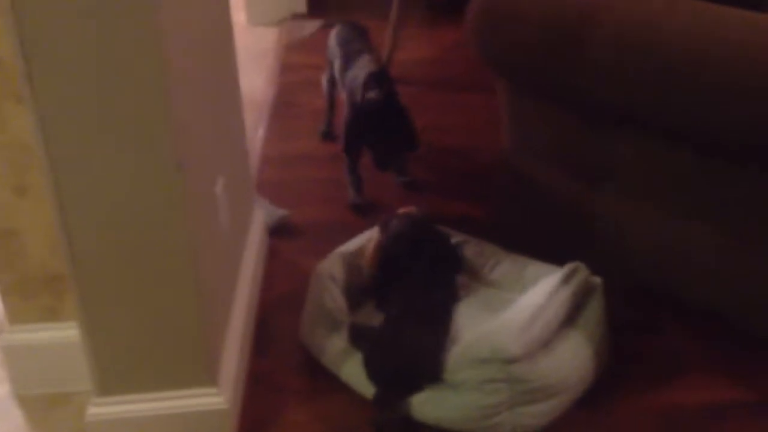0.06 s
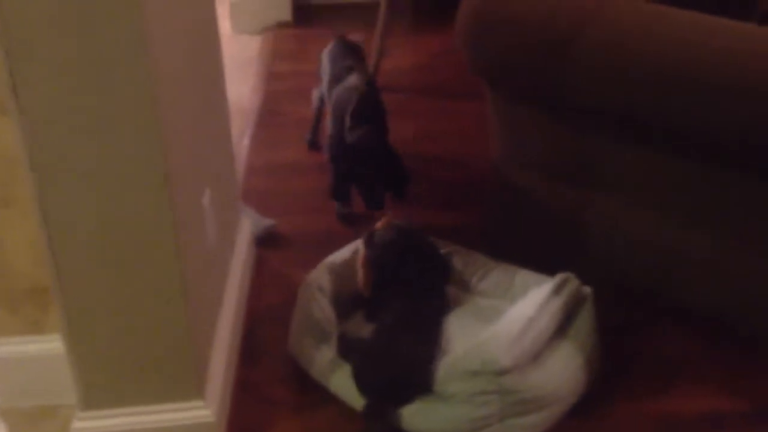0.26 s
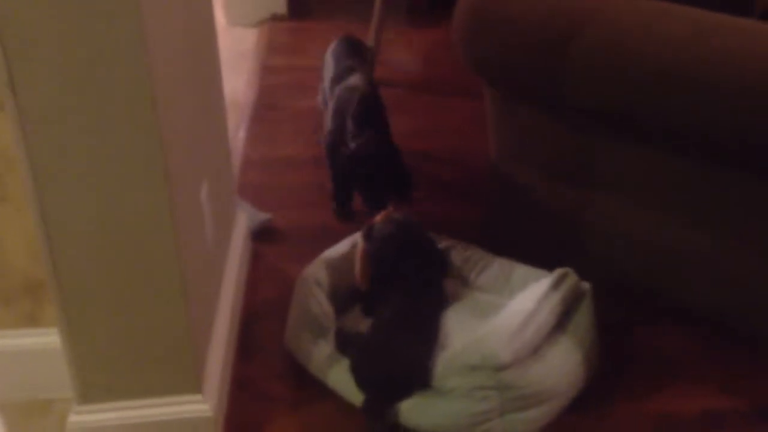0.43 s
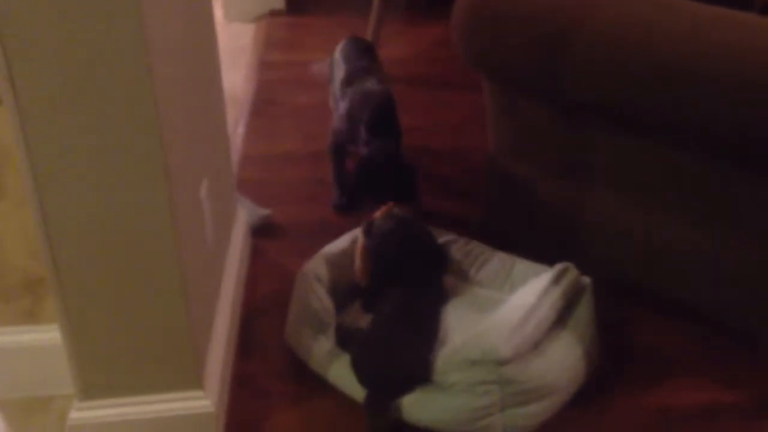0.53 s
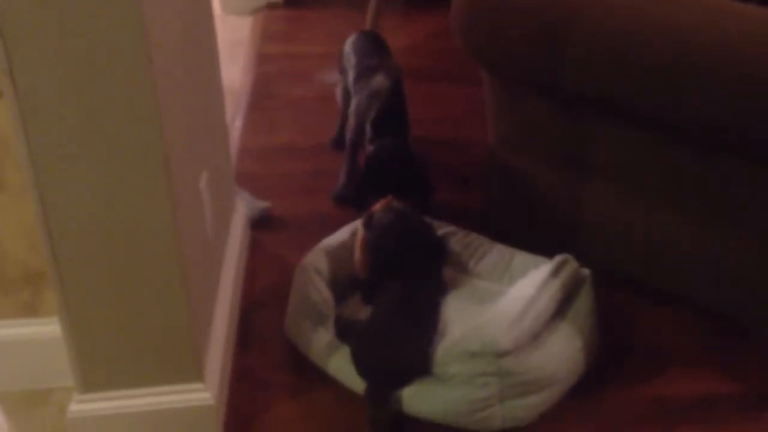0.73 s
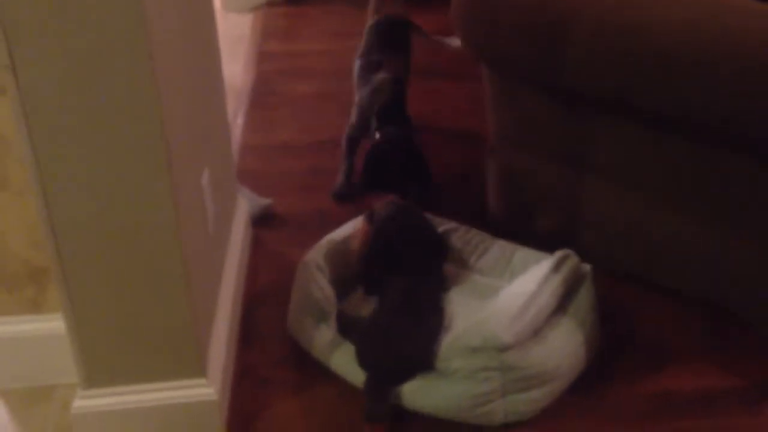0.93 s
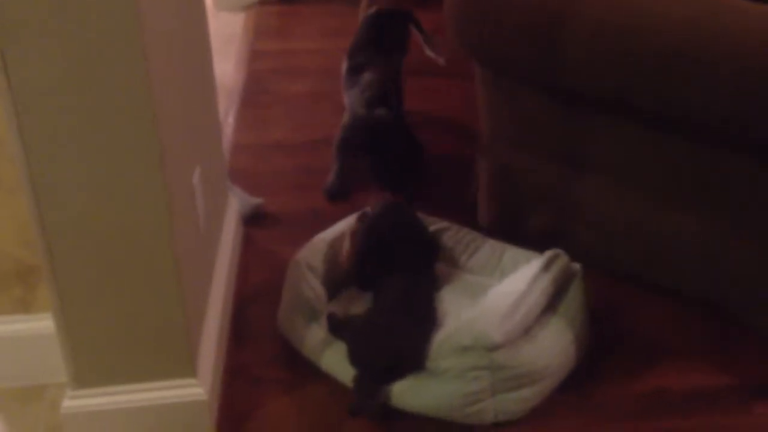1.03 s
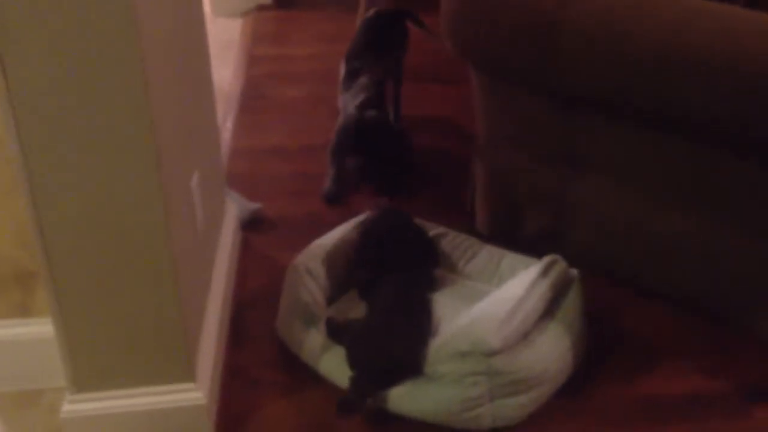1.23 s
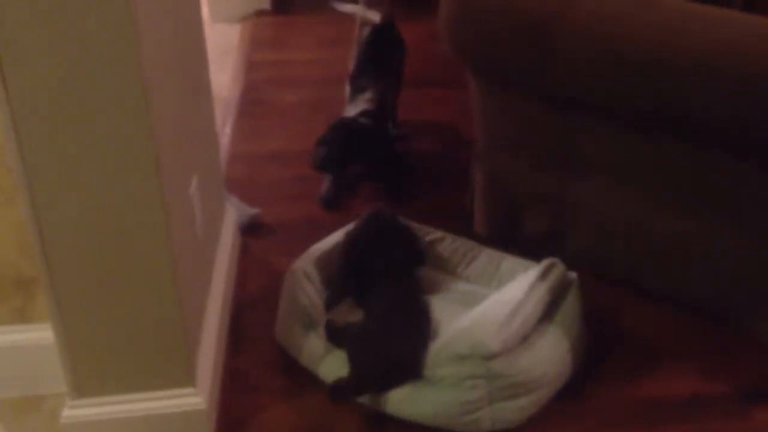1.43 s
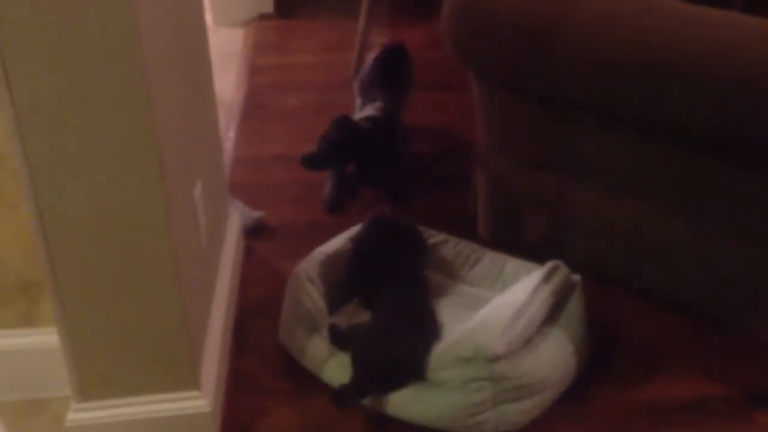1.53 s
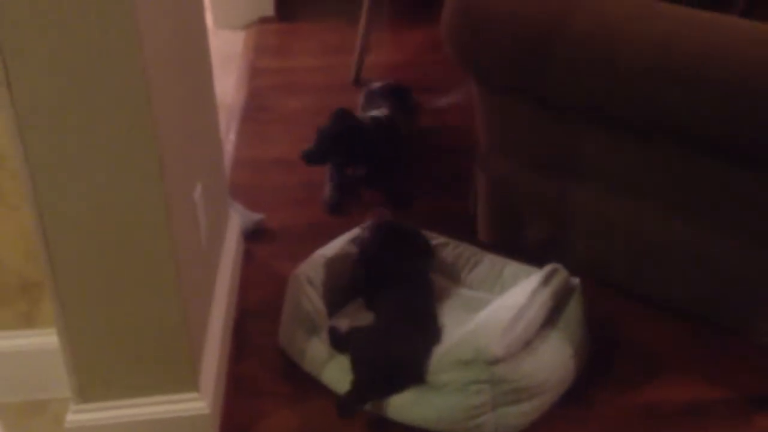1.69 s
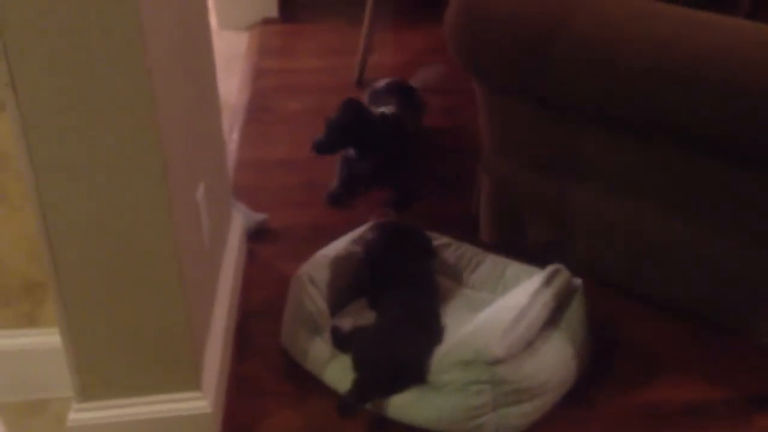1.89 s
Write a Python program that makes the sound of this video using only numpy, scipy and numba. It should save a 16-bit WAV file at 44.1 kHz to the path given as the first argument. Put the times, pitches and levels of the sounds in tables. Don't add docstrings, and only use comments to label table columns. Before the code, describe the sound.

A puppy gives a long, low, uneven growl in a wooden-floored hallway, collar tags tinkling

```python
import sys
import numpy as np
from scipy import signal
from scipy.io import wavfile
from scipy.ndimage import uniform_filter1d
from numba import njit

SR = 44100
rng = np.random.default_rng(int(sys.argv[2]) if len(sys.argv) > 2 else 0)


def nominal_scale(level):
    x = np.asarray(level, float) / 20
    return 10 ** x


def to_wav(s):
    ch = np.atleast_2d(s).T
    pcm = np.round(np.clip(ch, -1, 1) * 32767)
    wavfile.write(sys.argv[1], SR, pcm.astype(np.int16))


N = 85995

# (t/s, level/dB peak, bright edge level/dB, thud level/dB)
CLAW_TAPS = [(0.577, -55, -72, -80), (0.697, -49, -69, -85), (.7295, -79, -62, -85), (0.752, -80, -51, -73),
             (.7685, -75, -56, -85), (.857, -59, -57, -66), (1.2883, -62, -53, -84),
             (1.3214, -43, -65, -76), (1.3735, -64, -44, -61), (1.4536, -44.5, -75, -75),
             (1.5332, -60, -75, -85), (1.5517, -57, -64, -88), (1.557, -43, -64, -81),
             (1.566, -63, -56, -85), (1.579, -64, -66, -85), (1.6083, -39, -47.5, -68),
             (1.6168, -54, -66, -66), (1.624, -64, -61, -80), (1.6662, -51.5, -51, -85)]


@njit
def sweep(x, g, k):
    y, b, l = np.empty(len(x)), 0., 0.
    for i in range(len(x)):
        v = (b + g[i] * (x[i] - l)) / (1 + g[i] * (g[i] + k[i]))
        b, l, y[i] = 2 * v - b, l + 2 * g[i] * v, k[i] * v
    return y


def svf(x, hz, width):
    ones = np.ones(len(x))
    return sweep(x, np.tan(np.pi * hz / SR) * ones, width / hz * ones)


def unit(x):
    return x / np.sqrt(np.mean(x ** 2))


def walk(rate):
    hold = int(SR / rate)
    stairs = np.repeat(rng.standard_normal(N // hold + 1), hold)
    return unit(uniform_filter1d(uniform_filter1d(stairs, hold), hold)[:N])


def strike(times, gains, modes, cycles=0.42):
    t = np.arange(N) / SR
    luck = rng.standard_normal((len(times), 2 * len(modes)))
    out = np.zeros(N)
    for start, gain, r in zip(times, gains, luck):
        i = int(start * SR)
        u = t[i:i + SR // 4] - start
        for k, (hz, db, t60) in enumerate(modes):
            detuned_hz = hz * (1 + 0.0074 * r[2 * k + 1])
            ringing = np.sin(2 * np.pi * detuned_hz * u) * 1000. ** (-u / t60)
            contact = np.clip(u * hz / cycles, 0, 1)
            out[i:i + len(u)] += gain * nominal_scale(db + 1.9 * r[2 * k]) * ringing * contact
    return out


def house():
    # (f/Hz, level/dB per Hz)
    rumble_curve = [(65, -27), (110, -16.5), (284, 4.5), (650, -9.5), (832, -9), (923, -12.5), (1370, -13),
                    (1820, -19.5), (15300, -25)]
    # (f/Hz, level/dB)
    hum_lines = [(120, -99), (183, -75), (298, -85.5)]
    curve_hz, curve_db = np.array(rumble_curve).T
    rumble = 0
    for hz in 100 * 2 ** np.arange(0, 7.4, 1 / 3):
        band = svf(svf(rng.standard_normal(N), hz, hz / 3), hz, hz / 3)
        flicker_db = 0.5 * walk(8.1) * min(800 / hz, 1)
        rumble = rumble + band * nominal_scale(np.interp(np.log(hz), np.log(curve_hz), curve_db) + flicker_db)
    t = np.arange(N) / SR
    hum = sum(nominal_scale(db + 6.5 + 1.9 * walk(11)) * np.sin(2 * np.pi * hz * t) for hz, db in hum_lines)
    throb = unit(svf(rng.standard_normal(N), 95.0, 27.0))
    return nominal_scale(-62) * unit(rumble) + hum + nominal_scale(-64) * throb


def lens():
    # (t/s, level/dB peak)
    motor_ticks = [(.0402, -54), (.043, -52), (.0609, -56), (0.0644, -51), (0.1706, -50), (.1785, -52),
                   (.1802, -55), (.185, -54), (.1922, -57), (0.195, -50), (0.2026, -53), (0.2053, -52),
                   (.211, -54), (0.214, -53), (.219, -52), (0.2273, -51), (0.236, -53), (.2489, -56),
                   (.252, -51), (0.2595, -53)]
    # (f/Hz, level/dB, t60/s)
    housing = [(8880, 6, 0.0032), (10600, 7.5, 0.0015), (12800, 5, 0.0017)]
    times, db = np.array(motor_ticks).T
    return strike(times, nominal_scale(db - 7.0), housing)


def feet():
    # (t/s, level/dB peak)
    paw_knocks = [
        (0.206, -45.5),
        (0.214, -51),
        (1.899, -82),
        (1.91, -78),
    ]
    # (f/Hz, level/dB, t60/s)
    board_modes = [(291, -1, 0.19), (408, -6, 0.17), (767, -1, 0.021), (1020, -0.5, 0.015),
                   (1305, 17.5, 0.0046), (1700, 9, 0.0088), (2110, -6, 0.011)]
    claw_modes = [(2100, -6, .007), (3300, -2, .007), (4000, -2, .006), (4700, -3, .006)]
    edge_modes = [(7200, -3, .003), (8500, -4, .003), (11200, -4, .003), (12800, -5, .002),
                  (14300, -10, .002)]
    # (t/s, level/dB, length/s, centre f/Hz)
    scuffs = [
        (.29, -72.5, 0.084, 4200),
        (0.53, -69, 0.045, 2200),
        (1.31, -64.5, 0.046, 3960),
        (1.545, -59, 0.063, 4000),
        (2, -62, 0.023, 4300),
        (1, -62, 0.039, 12000),
        (.857, -70.5, 0.087, 10600),
        (1.165, -73, 0.035, 11000),
    ]
    t = np.arange(N) / SR
    times, db, edge_db = np.array(CLAW_TAPS).T[:3]
    out = strike(times, nominal_scale(db - 1.0), claw_modes, cycles=1.63)
    out = out + strike(times, nominal_scale(edge_db - 1.5), edge_modes)
    times, db = np.array(paw_knocks).T
    out = out + strike(times, -nominal_scale(db - 7.0), board_modes, cycles=0.66)
    for start, db, length, hz in scuffs:
        grit = rng.standard_normal(N) * nominal_scale(1.6 * walk(300))
        rise = np.clip((t - start) / 0.0078, 0, 1)
        fall = np.clip(1 - (t - start) / length, 0, 1) ** .5
        rub = svf(svf(grit, hz, .5 * hz), hz, .5 * hz) + 0.44 * svf(grit, 6700.0, 5500.0)
        out = out + nominal_scale(db) * rise * fall * unit(rub)
    return out


@njit
def fire(hz, stretch, size, weak):
    pulses, gate, p, k = np.zeros(len(hz) + 1), np.empty((2, len(hz))), 0., 0
    for i in range(len(hz)):
        step = hz[i] * stretch[k] / SR
        p += step
        if p >= 1:
            p, k = p - 1, k + 1
            s = size[k] * (1 - weak[i] * (k % 2))
            pulses[i] += s * p / step
            pulses[i + 1] += s * (1 - p / step)
        gate[0, i], gate[1, i] = p, size[k] * (1 - weak[i] * (k % 2))
    return pulses[:-1], gate


def ring(x, hz, width):
    return unit(svf(svf(x, hz, width), hz, 1.72 * width))


def growl():
    # (t/s, pulse rate f/Hz, level/dB, chest level/dB, flutter 0-1,
    # mouth opening level/dB, breath level/dB)
    course = [(0.438, 222.8, -54, -0.5, 1.1, -2.5, -8), (0.502, 227.4, -49, -5, 0.4, -4, -3.5),
              (0.587, 227.1, -48, 1.5, 0.69, -4.5, -0.5), (.66, 217.4, -51.5, -7, 0.4, 0.5, -1),
              (.76, 227.6, -48, -4.5, 0.03, 0, -0.5), (0.842, 239.2, -50, -9, 0.3, 4.5, 2.5),
              (.91, 233.3, -45.5, -1.5, .2, 1, -5), (0.971, 242.5, -44.5, -4, 0.1, -15, -10),
              (1.059, 244.1, -48, -6.5, 0.02, -0.5, -1.5), (1.104, 232.9, -47.5, 2, 0, -1.5, -1),
              (1.149, 243.5, -47, 2.5, 0.3, 2, 0.5), (1.24, 246.2, -49.5, -9.5, 0, 3.5, -3.5),
              (1.31, 239.5, -50.5, -7, 0.3, 6.5, 6), (1.371, 211.3, -41.5, -32, 0.5, -6.5, -4),
              (1.452, 194.5, -48.5, -36, 0.5, 0.5, -0.5), (1.529, 195.5, -51.5, -27, 0.64, 0, -18),
              (1.618, 207.8, -51, -3, 0.8, -3, 8.5), (1.681, 188, -73, 13, 0.8, 3, 7)]
    # (f/Hz, width f/Hz, level/dB)
    throat = [(213, 148, 0), (377, 240, -27.5), (619, 239, -12.5), (1170, 220, -16.5), (1460, 400, -24),
              (1850, 610, -26.5)]
    # (f/Hz, width f/Hz, level/dB)
    nostrils = [(2230, 370, -28.5), (3543, 480, -24), (4510, 270, -28), (7700, 1750, -25.5),
                (12200, 2300, -30.5)]
    # (t/s, depth level/dB, half length t/s)
    catches = [(0.469, -27, 0.0098), (0.501, -21, 0.0069), (.529, -19, 0.0097), (0.569, -20, 0.0064),
               (0.628, -23, 0.0069), (0.68, -28, 0.0048), (0.841, -8, 0.0065), (0.88, -4.5, 0.0094),
               (.911, -36, 0.0069), (.955, -11, 0.007), (0.991, -31, 0.011), (1.128, -14, 0.014),
               (1.159, -12, 0.0094), (1.187, -10, .007), (1.287, -7, 0.0029), (1.36, -10, 0.0088),
               (1.392, -22, 0.0084), (1.432, -6, 0.0051), (1.467, -25, 0.0061), (1.496, -2, 0.0064),
               (1.55, -16, 0.011), (1.589, -21, 0.0084), (1.649, -19, 0.0052), (1.672, -9, 0.0058)]
    t, rows = np.arange(N) / SR, np.array(course)
    hz, db, chest_db, flutter, mouth_db, breath_db = (np.interp(t, rows[:, 0], rows[:, k]) for k in range(1, 7))

    jitter, shimmer_db, wander, weak = .03, 1.8, .01, 0.7
    luck = rng.standard_normal((N // 50, 2)).T
    pulses, gate = fire(hz * (1 + wander * walk(12)), 1 + jitter * luck[0], nominal_scale(shimmer_db * luck[1]),
                        np.full(N, weak))
    phase, size = gate
    puffs = unit(size * np.exp(-phase / .8) * rng.standard_normal(N))

    _, low_width, low_db = throat[0]
    breathy = .45 * (flutter + 0.53) * ring(puffs, hz, low_width)
    voice = ring(ring(pulses, hz, low_width) + breathy, hz, 2 * low_width)
    steady, clean = ring(np.cos(2 * np.pi * phase), hz, 0.53 * low_width), 1.1
    fundamental = nominal_scale(low_db + 3.5) * (voice + clean * steady) / (1 + clean)
    chest = ring(unit(pulses) + .6 * puffs, 153, 38)
    half_tone = 0.92 * ring(pulses, hz / 2, 33.0)
    low = fundamental + nominal_scale(chest_db) * (chest + half_tone)

    jaw = 1 + 0.0087 * mouth_db + 0.034 * walk(8.2)
    rasp = unit(pulses) + nominal_scale(-3.5) * puffs
    mouth = 0
    for k, (f, w, g) in enumerate(throat[1:]):
        gain = nominal_scale(g + 1.5 * walk(10.82) + mouth_db * min(f / 1200, 1))
        mouth = mouth + gain * ring(rasp, f * jaw, w) * (-1) ** k
    nose = sum(nominal_scale(g + 1.04 * walk(20.5) + breath_db) * ring(puffs, f, w) for f, w, g in nostrils)

    onset = np.clip((t - rows[0, 0]) / 0.0093, 0, 1)
    release = np.clip((rows[-1, 0] - t) / 0.022 + 1, 0, 1)
    catch_db = sum(depth_db * np.exp(-((t - s) / half) ** 2) for s, depth_db, half in catches)
    choked = low * nominal_scale(catch_db) + (mouth + nose) * nominal_scale(.25 * catch_db)
    return choked * nominal_scale(db) * onset * release


def thuds():
    t, jolt_s = np.arange(N) / SR, 0.0044
    out = np.zeros(N)
    for start, _, _, thud_db in CLAW_TAPS:
        u = (t - start) / jolt_s
        out += nominal_scale(thud_db) * u * np.exp(-u ** 2)
    return out


def tags():
    # (t/s, level/dB peak, which tag 0-1, overtones level/dB)
    tag_hits = [(.5836, -53, 0.93, -19), (.5914, -64, 0.96, -20), (.7372, -62, 0.8, -37),
                (.857, -59, 0.64, 6), (0.82, -62, 0.9, -23), (.836, -62, 0.3, -15), (.869, -53, 0.4, -10),
                (.902, -60, 0.8, -20), (.915, -62, 0.1, -20), (.957, -59, 0.9, -25),
                (0.986, -58, 0.76, -20), (0.9374, -53.5, 0.14, -14), (1.0256, -57, 0.02, -37),
                (1.062, -49.5, 0.3, -29), (1.1252, -51, 0.58, -4), (1.1675, -49.5, 0.86, -3),
                (1.203, -58, 0.1, -17), (1.321, -48.5, 0.2, -8), (1.3382, -54, 0.96, 1),
                (1.3444, -54.5, 0.9, 5), (1.3725, -47.5, 0.52, 1.5), (1.414, -42, 0.36, -11),
                (1.4711, -67, 0.3, -26), (1.754, -66.5, 0.15, -26)]
    # (f/Hz, level/dB, t60/s)
    first_tag = [(7310, -1, 0.037), (9965, -4.5, 0.092), (13400, -4, 0.02)]
    second_tag = [(7875, -4.5, 0.06), (8750, -7, 0.025), (11770, -6.5, 0.021), (6720, -7, 0.011)]
    times, db, which, over_db = np.array(tag_hits).T
    out = np.zeros(N)
    for tag, share in ((first_tag, np.clip(1 - which, 0, 1)), (second_tag, np.clip(which, 0, 1))):
        out += strike(times, nominal_scale(db) * share, tag[:1])
        out += strike(times, nominal_scale(db + over_db) * share, tag[1:])
    return out


def hallway(x):
    u = np.arange(SR // 2) / SR
    noise = rng.standard_normal(len(u))
    damp_hz, t60_s, bright_t60_s = 3640, 0.58, 0.44
    dull = signal.lfilter([1], [1, -np.exp(-2 * np.pi * damp_hz / SR)], noise)
    tail = unit(dull) + 0.076 * noise * 1000. ** (-u / bright_t60_s)
    tail = tail * 1000. ** (-u / t60_s) * (u > .004)
    return signal.fftconvolve(x, tail / np.sqrt(np.sum(tail ** 2)))[:N]


def scene():
    head, paws = growl() + tags(), feet()
    lean_head = head - .7 * svf(head, 202.0, 200.0)
    wet = hallway(lean_head + 0.65 * paws)
    return (head + paws + nominal_scale(-6) * wet + lens() + house())[None]


def roll_off(x):
    return signal.sosfilt(signal.butter(12, 15570, fs=SR, output="sos"), x)


def record(dry):
    bass_cut = signal.cheby1(8, .5, 124.6, "high", fs=SR, output="sos")
    top_cut = signal.ellip(8, .2, 60, 15350, fs=SR, output="sos")
    x = signal.sosfilt(bass_cut, dry) + nominal_scale(-26.5) * dry
    hiss = nominal_scale(-81) * unit(svf(rng.standard_normal(N), 14500.0, 2700.0))
    x = signal.sosfilt(top_cut, x + thuds() + hiss)
    return roll_off(x)


dry = scene()
out = record(dry)
to_wav(out)
```